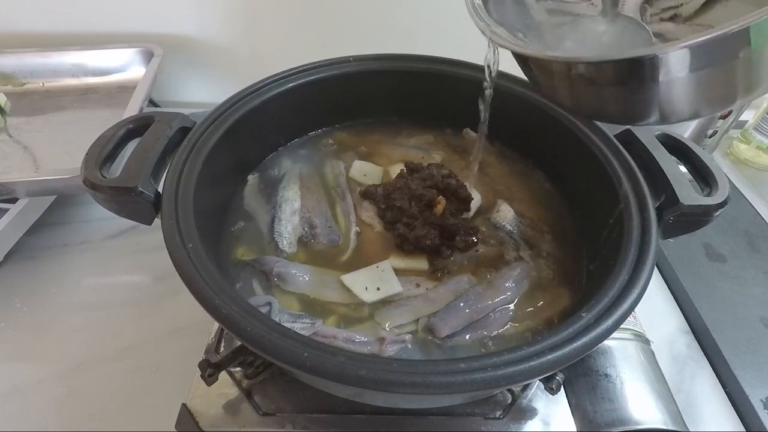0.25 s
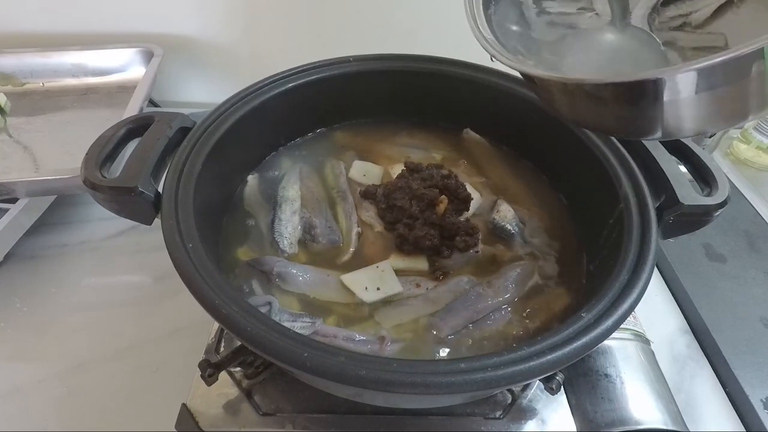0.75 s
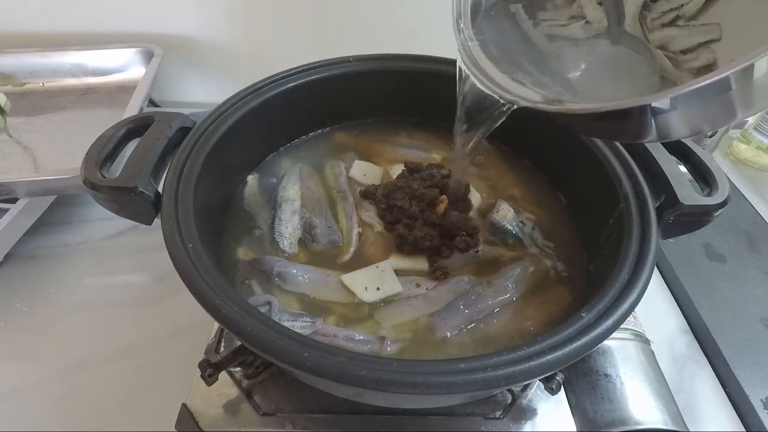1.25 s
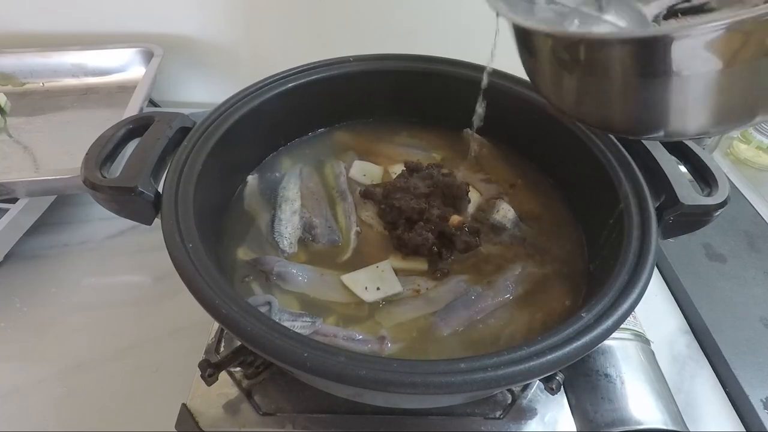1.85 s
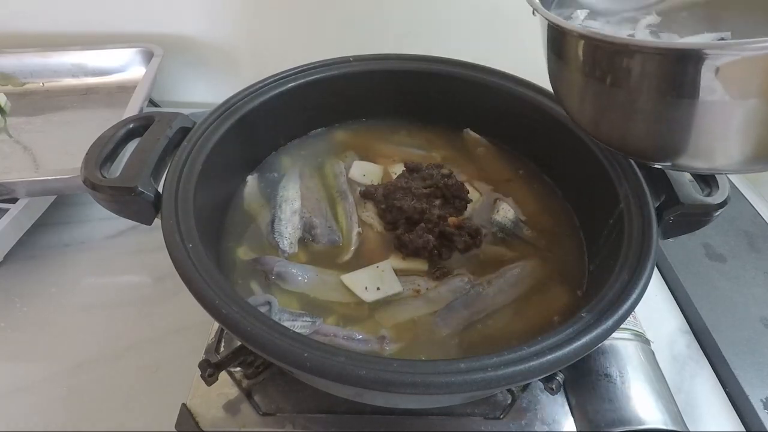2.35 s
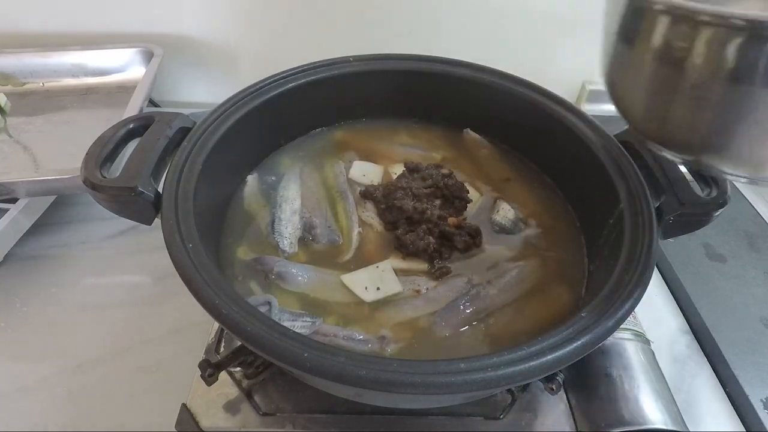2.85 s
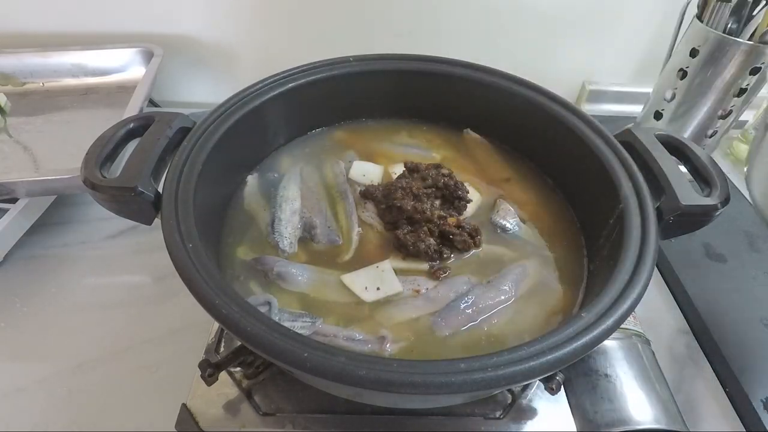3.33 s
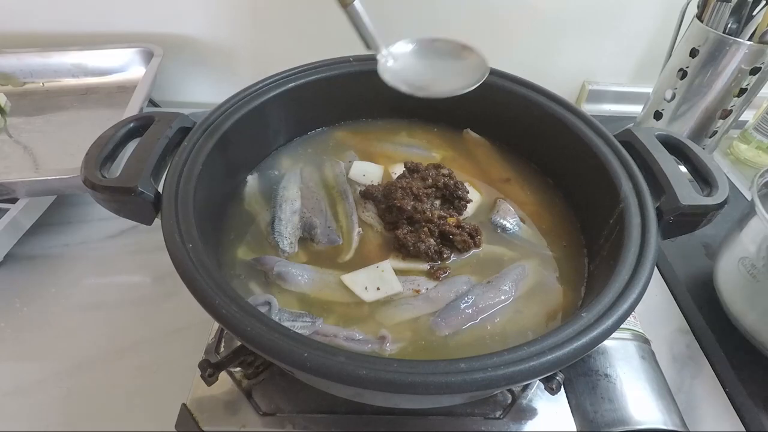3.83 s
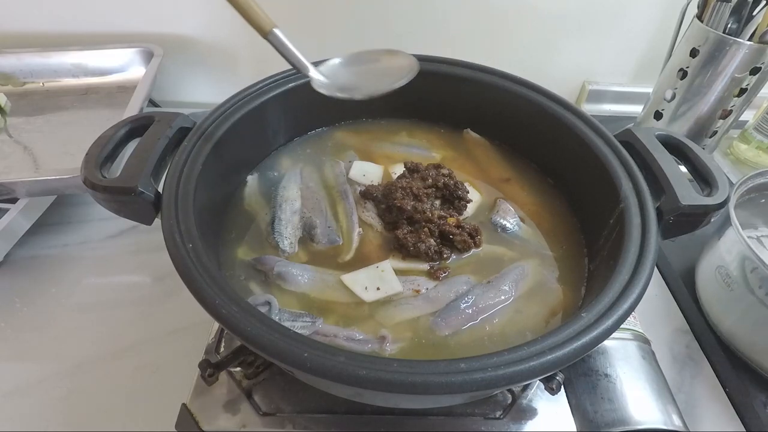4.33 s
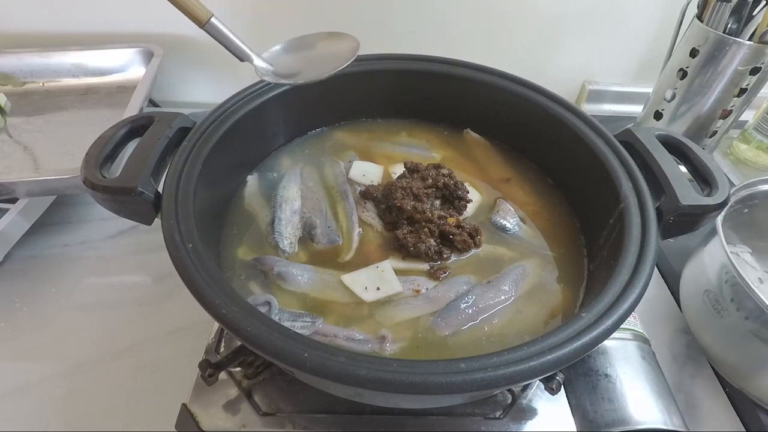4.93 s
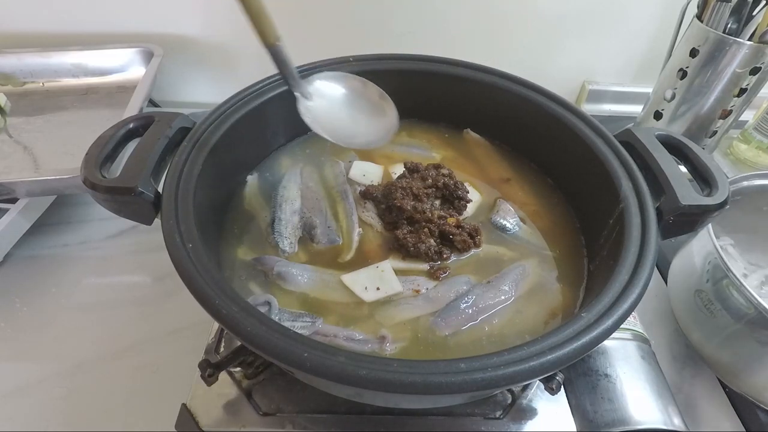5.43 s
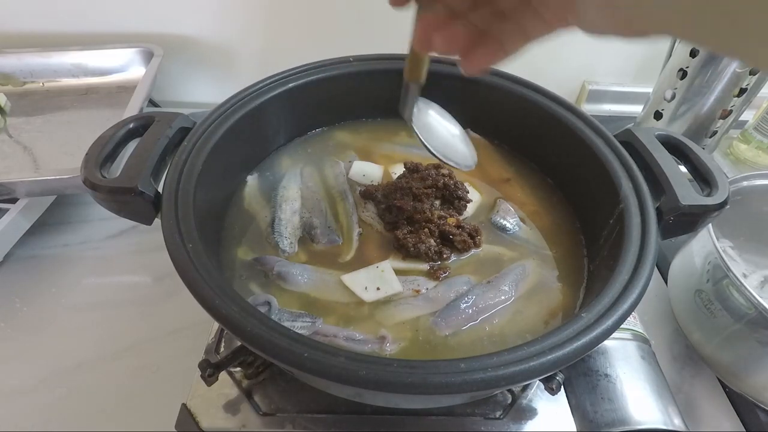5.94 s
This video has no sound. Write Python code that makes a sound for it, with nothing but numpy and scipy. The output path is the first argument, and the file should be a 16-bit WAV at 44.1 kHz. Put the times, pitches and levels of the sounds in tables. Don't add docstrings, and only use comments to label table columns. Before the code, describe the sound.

A deep, unsteady fan and fridge hum fills a small kitchen from start to finish, strongest at the very beginning, throbbing and swelling over a soft airy rush. Water is already trickling thinly from a steel bowl into a stew pot, with fine fizz and high plinks, and stops at about 0.5 s. A second, slightly busier pour begins near 1.2 s, bubbling brightly until about 1.9 s, then thins to stray drops by 2.1 s. Only hum remains until about 4.15 s, when a jar lands on a hollow steel counter with a low boom and dull metallic clack, rocking and settling in quick knocks until 4.4 s. A very faint sleeve brush follows around 4.8 and 5.15 s. A firm, muffled nudge comes at 5.2 s, a low bump at 5.35 s, and a barely audible touch at 5.8 s. The small microphone slightly flattens the loudest lows.

```python
import sys
import numpy as np
from scipy import signal
from scipy.fft import rfft, irfft, next_fast_len
from scipy.io import wavfile
from scipy.ndimage import uniform_filter1d, map_coordinates

SR = 44100
rng = np.random.default_rng(int(sys.argv[2]) if len(sys.argv) > 2 else 0)


def master(y):
    cut = np.clip(np.atleast_2d(y).T, -1, 1)
    pcm = np.round(cut * 32767)
    wavfile.write(sys.argv[1], SR, pcm.astype(np.int16))


def ratio_of_db(decibels):
    return 10 ** (np.asarray(decibels, float) / 20)


N = 272538
RING = SR * 3 // 5

TONE_HZ = [32.2, 57.9, 94, 116.5]
TONE_DB = [-39.5, -38.5, -42.5, -34]
# centre_s, peak_db, length_s
THROB_SWELLS = [(.1, -24, 0.5), (0.7, -27, 0.22), (0.954, -27, .15), (1.217, -24, 0.17),
                (1.51, -20.5, 0.11), (1.895, -27, 0.81), (2.57, -23.5, 0.15), (2.85, -22.5, 0.16),
                (3.3, -27.5, 0.47), (3.685, -24, 0.12), (4.0, -23.5, 0.11), (4.798, -31, .4),
                (5.58, -27.5, 0.54), (6.05, -30, .2)]
HUM_SWELLS = [(-.02, -9.5, .25), (.27, -19, 0.38), (.99, -20, 0.086), (1.38, -28, 0.13), (1.9, -31, 0.25),
              (2.25, -25, 0.35), (2.62, -26.5, 0.16), (2.93, -18, 0.25), (3.35, -20, 0.22),
              (3.62, -27, 0.26), (4.33, -21, 0.48), (4.86, -23.5, 0.26), (5.6, -21.5, 0.18),
              (5.85, -24.5, 0.14), (6.1, -32, .15)]
DRONE_SWELLS = [
    (4.78, -24.5, 0.29),
    (5.75, -31, 0.33),
]
FAN_SWELLS = [(.17, -17.5, 0.12), (.68, -27.5, 0.38), (1.04, -26, 0.085), (1.24, -22, 0.075),
              (1.58, -24, .15), (1.87, -26.5, 0.29), (2.38, -28, 0.13), (2.85, -22.5, 0.12),
              (3.31, -28, 0.11), (4.19, -17.5, 0.042), (4.35, -17.5, 0.4), (5.27, -19.5, 0.22),
              (5.65, -25.5, 0.17), (6.0, -30, 0.13)]
# pitch_hz, width_hz, level_db
ROOM_RESONANCES = [(89.2, 12.6, -39), (138.63, 2.3, -37.5), (151, 8.5, -41.5), (178.33, 3.7, -38.5),
                   (236.3, 2.9, -52.5), (301.1, 6.2, -50), (552, 95, -51.5), (725, 38, -62)]
# frequency_hz, density_db
FAN_RUSH = [(15, -29), (30, -6.5), (70, -11), (150, -15), (200, -18.5), (440, -29), (600, -32.5),
            (1300, -41), (2000, -43.5), (2500, -49), (5000, -52.5), (7000, -58), (10000, -60.5),
            (15000, -76.5)]
# frequency_hz, t60_s
ROOM_DECAY = [(100, 0.87), (400, 0.3), (1100, 0.46), (3000, 0.3), (8000, 0.28), (15000, .12)]

# centre_s, peak_db, length_s
SLEEVE_STROKES = [
    (4.84, -52, 0.22),
    (5.15, -53.5, 0.2),
]
# frequency_hz, density_db
CLOTH = [(1000, -17), (2500, -4), (4500, -1.5), (6500, -6.5), (7500, -14), (9500, -14), (12000, -28.5)]

# pitch_hz, level_db, t60_s
COUNTER_MODES = [(93, 0, .55), (122, -7, .25), (151, -3, .45), (190, -14, .3), (225, -14, .3),
                 (286, -12, .4), (357, -14, .3), (440, -21, .25), (505, -18, .3), (590, -26, .25),
                 (660, -27, .22), (725, -27, .25)]
# pitch_hz, level_db, t60_s
STEEL_MODES = [(986, 0, .15), (1133, -1, .2), (1307, -4, .15), (1760, -3, .2), (1946, -4, .18),
               (2290, -7, .12), (3090, -8, .1), (3250, -8, .06), (4720, -3, .18), (5845, -7, .1),
               (6090, -10, .1), (6600, -11, .08), (8320, -17, .1)]
# frequency_hz, density_db
BOOM = [(60, -36), (90, -1.5), (150, -2), (220, -5), (400, -12.5), (700, -24.5), (1100, -58), (2000, -62)]
CLACK = [(300, 1.5), (700, 3.5), (2000, -6.5), (4800, -8.5), (8600, -19.5), (14000, -33), (16000, -55)]
# start_s, boom_db, thump_db, thump_hz, clack_db
JAR = [
    (4.154, -34, -30, 120.1, -40),
    (4.162, -6.5, -0.5, 123, -27.5),
    (4.192, -12.5, -14, 340, -42),
    (4.311, -10.5, -10, 198, -32),
    (4.333, -16, -12, 279, -57),
    (4.356, -34, -27, 523, -42),
    (4.378, -20.5, -5, 288, -43),
]
# start_s, boom_db, thump_db, thump_hz, clack_db
NUDGE = [
    (5.178, -7.5, -5, 252, -34.5),
    (5.2, -27, -20, 495, -53),
    (5.336, -22.5, -1.5, 103, -70),
    (5.828, -41, -22, 296, -65),
]

# full_s, tipped_back_s, splash_db, drying_db_per_s
POURS = [
    (-.2, 0.429, -55.5, 149.5),
    (1.195, 1.849, -56.5, 40),
]
# start_s, level_db, pitch_hz
BUBBLES = [(0.009, -45, 6800), (0.083, -51, 2929), (0.21, -45, 2980), (0.242, -52, 4823),
           (0.261, -52, 6891), (0.384, -43, 3760), (0.387, -53, 6600), (0.483, -50, 4823),
           (1.188, -41, 5360), (1.191, -47, 6760), (1.252, -35.5, 3120), (1.3, -51, 4823),
           (1.348, -46, 4134), (1.385, -40, 2560), (1.441, -40.5, 4970), (1.475, -44, 1900),
           (1.5, -44.5, 9200), (1.505, -51, 3160), (1.558, -41, 3870), (1.582, -38, 4720),
           (1.587, -33, 6850), (1.624, -48, 4770), (1.625, -47, 7063), (1.682, -48, 4307),
           (1.696, -51, 4651), (1.795, -45, 3350), (1.807, -48, 6500), (1.815, -46, 3480),
           (1.909, -47, 4134), (1.921, -48, 2550)]
# start_s, level_db
SPRAY = [(0.057, -56), (0.085, -52), (0.104, -57), (0.158, -59), (0.177, -57), (0.192, -52), (0.389, -52),
         (0.427, -56), (0.669, -55), (1.278, -54), (1.333, -59), (1.345, -53), (1.495, -57), (1.502, -54),
         (1.587, -57), (1.713, -52), (1.743, -58), (1.757, -54), (1.834, -55), (1.855, -58), (1.977, -55),
         (2.145, -58)]
# frequency_hz, density_db
SPLASH = [(800, -18), (2500, 3), (4500, 1.5), (7000, -8.5), (10000, -12), (14000, -20), (16000, -41)]


def unit(x):
    return x / np.sqrt(np.mean(x ** 2) + 1e-20)


def along(points, hz):
    f, v = np.transpose(points)
    return np.interp(np.log(hz + 1), np.log(f + 1), v)


def wobble(rate):
    knots = rng.standard_normal(int(N * rate / SR) + 4)
    return map_coordinates(knots, [np.arange(N) * rate / SR])


def noise(gain, size=N):
    m = next_fast_len(size)
    spectrum = rfft(rng.standard_normal(m)) * gain(np.fft.rfftfreq(m, 1 / SR))
    return unit(irfft(spectrum, m)[:size])


def tail(spectrum, scale):
    burst = noise(lambda f: ratio_of_db(along(spectrum, f)), size=RING)
    hz, t, z = signal.stft(burst, SR, nperseg=512)
    t60 = scale * along(ROOM_DECAY, hz)[:, None]
    return signal.istft(z * ratio_of_db(-60 * t / t60), SR, nperseg=512)[1][:RING]


def add(track, s, sound):
    track[max(round(s * SR), 0):][:len(sound)] += sound


def swells(rows):
    t = np.arange(N) / SR
    return sum(ratio_of_db(db) * np.exp(-2 * ((t - s) / (length / 2 ** .5)) ** 2) for s, db, length in rows)


def machines():
    t = np.arange(N) / SR - .75
    rows_of_tone = [THROB_SWELLS, HUM_SWELLS, DRONE_SWELLS, FAN_SWELLS]
    phase_wander = [1.65, .9, 0.51, 0.51]
    out = np.zeros(N)
    for hz, db, rows, wander in zip(TONE_HZ, TONE_DB, rows_of_tone, phase_wander):
        level = ratio_of_db(db) + ratio_of_db(-1) * swells(rows)
        out += level * np.cos(2 * np.pi * hz * t + wander * wobble(7))
    beat_hz = 3.55
    out += ratio_of_db(-35) * np.cos(2 * np.pi * (TONE_HZ[-1] + beat_hz) * t)
    for hz, width, db in ROOM_RESONANCES:
        out += ratio_of_db(db) * noise(lambda f: 1 / (1 + (2 * (f - hz) / width) ** 2))
    rush = noise(lambda f: ratio_of_db(along(FAN_RUSH, f)))
    return out + ratio_of_db(-29.5 + 0.46 * wobble(11)) * rush


def sleeve():
    return swells(SLEEVE_STROKES) * ratio_of_db(2.0 * wobble(72)) * noise(lambda f: ratio_of_db(along(CLOTH, f)))


def ring(modes, t):
    out = np.zeros(len(t))
    for k, (hz, db, t60) in enumerate(modes):
        decay = ratio_of_db(db + 2 * rng.standard_normal() - 60 * t / t60)
        onset = 1 - np.exp(-t * hz / 1.2)
        out += (-1) ** k * decay * onset * np.sin(2 * np.pi * hz * t)
    return out


def counter():
    out, t = np.zeros(N + SR), np.arange(RING) / SR
    loud_db, dulling = -30.5, .4
    contacts = [(*row, 15000) for row in JAR] + [(*row, 6000) for row in NUDGE]
    for s, boom_db, thump_db, thump_hz, clack_db, top_hz in contacts:
        boom = 0.7 * ring(COUNTER_MODES, t) + 0.5 * (1 - np.exp(-t / 0.015)) * tail(BOOM, 1.0)
        thump = ratio_of_db(thump_db - 60 * t * thump_hz / 14) * np.sin(2 * np.pi * thump_hz * t)
        thump *= 1 - np.exp(-t * thump_hz / 0.76)
        crack = 0.94 * ratio_of_db(-60 * t / 0.016) * noise(lambda f: ratio_of_db(along(CLACK, f) / 2), size=RING)
        clack = 0.39 * ring(STEEL_MODES, t) + 0.82 * tail(CLACK, 1.0) + crack
        cutoff = min(top_hz * ratio_of_db(dulling * (clack_db - loud_db)), 15200)
        soft = signal.butter(2, cutoff, fs=SR, output="sos")
        add(out, s + 0.00295, ratio_of_db(boom_db) * boom + thump)
        add(out, s, ratio_of_db(clack_db) * (1 - np.exp(-t / 0.00042)) * signal.sosfilt(soft, clack))
    return out[:N]


def flow():
    t = np.arange(N) / SR
    rise = 130
    return sum(ratio_of_db(db - rise * np.maximum(s - t, 0) - dry_db * np.maximum(t - end, 0))
               for s, end, db, dry_db in POURS)


def small_bubbles(count):
    share, draw = np.cumsum(flow() ** 2), rng.standard_normal((count, 2))
    even = (np.arange(count) + rng.random(count)) / count
    s = np.interp(even, share / share[-1], np.arange(N) / SR)
    octaves = .27 * draw[:, 0] / np.log(2)
    level_db = -60 - 5 * octaves + 2.5 * draw[:, 1]
    return list(zip(s, level_db, 5800 * 2 ** octaves))


def bubbles(out, t):
    for s, db, hz in BUBBLES + small_bubbles(count=70):
        life = 0.0039 + 30 / hz
        chirp = np.sin(2 * np.pi * hz * t * (.97 + 0.037 * t / life))
        log_width = 11 / np.sqrt(hz)
        splash = noise(lambda f: np.exp(-(np.log((f + 1) / (1.06 * hz)) / log_width) ** 2), size=len(t))
        envelope = ratio_of_db(db + 18.0 - 60 * t / life) * (1 - np.exp(-t / 0.0016)) ** 2
        add(out, s - .0005, envelope * (chirp + 0.41 * splash))


def spray(out, t):
    tick = [(3000, -30), (10000, -16), (12000, -2), (15000, -3)]  # frequency_hz, density_db
    for s, db in SPRAY:
        hiss = noise(lambda f: ratio_of_db(along(tick, f)), size=len(t))
        add(out, s, ratio_of_db(db + 9 - 60 * t / 0.0098) * (1 - np.exp(-t / .001)) * hiss)


def fizz():
    z = signal.stft(noise(lambda f: ratio_of_db(along(SPLASH, f))), nperseg=128)[2]
    specks = uniform_filter1d(rng.standard_normal(z.shape), size=4, axis=0)
    specks = uniform_filter1d(specks, size=4, axis=1)
    return unit(signal.istft(z * ratio_of_db(5.9 * unit(specks)), nperseg=128)[1][:N])


def water():
    out, t = np.zeros(N + SR), np.arange(SR // 25) / SR
    bubbles(out, t)
    spray(out, t)
    return out[:N] + flow() * fizz()


def scene():
    wet = water()
    echo = signal.fftconvolve(wet, tail([(500, 0), (15000, 0)], 0.52))[:N]
    return (machines() + sleeve() + counter() + wet + ratio_of_db(-34) * echo)[None]


def top_cut(x):
    return signal.sosfilt(signal.butter(12, 15180, fs=SR, output="sos"), x)


def record(dry):
    rounded = dry / (1 + np.abs(dry / .68) ** 5) ** (1 / 5)
    opened = rounded * np.minimum(.2 + np.arange(N) / 200, 1)
    return top_cut(opened)


dry = scene()
out = record(dry)
master(out)
```